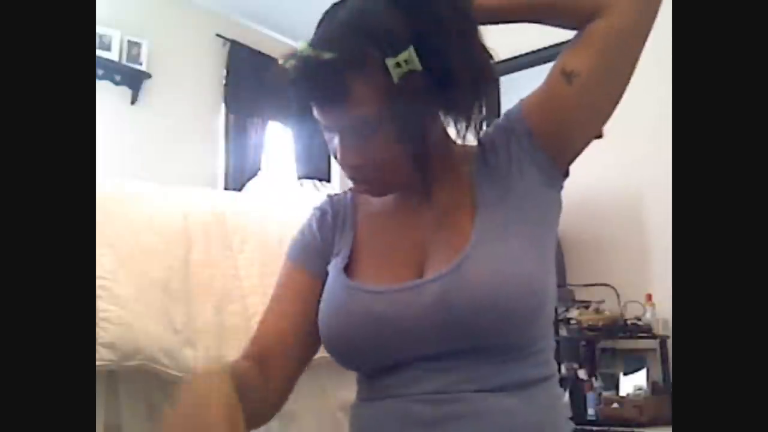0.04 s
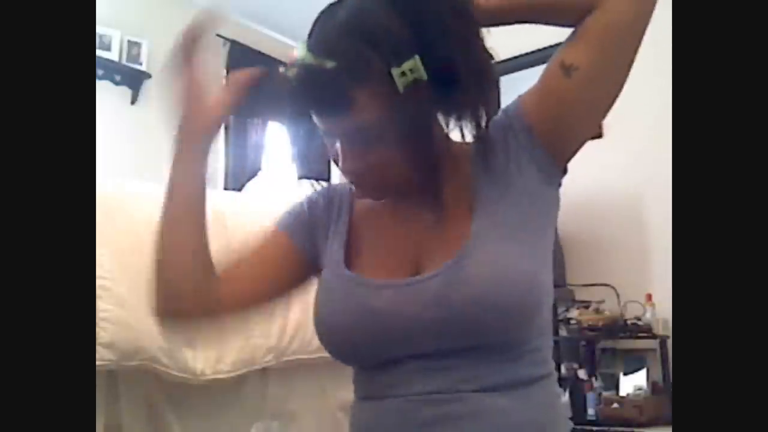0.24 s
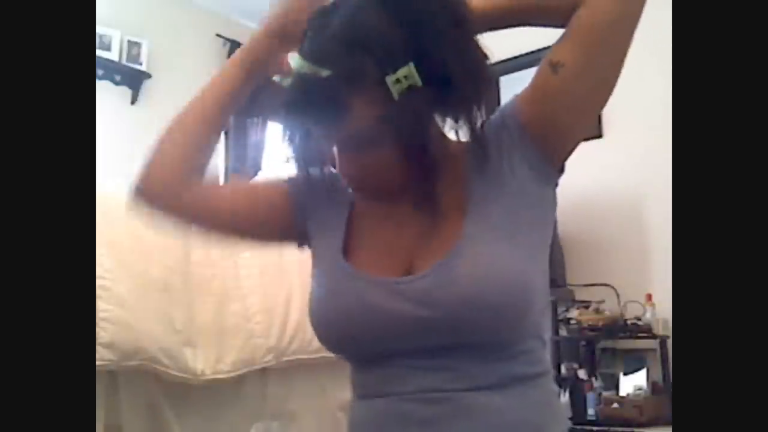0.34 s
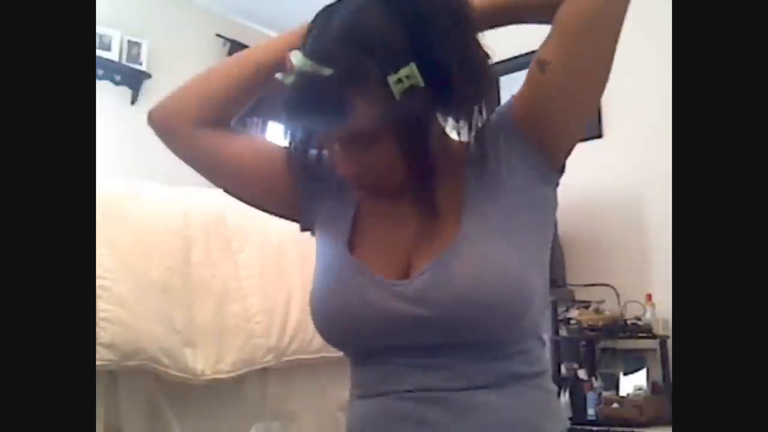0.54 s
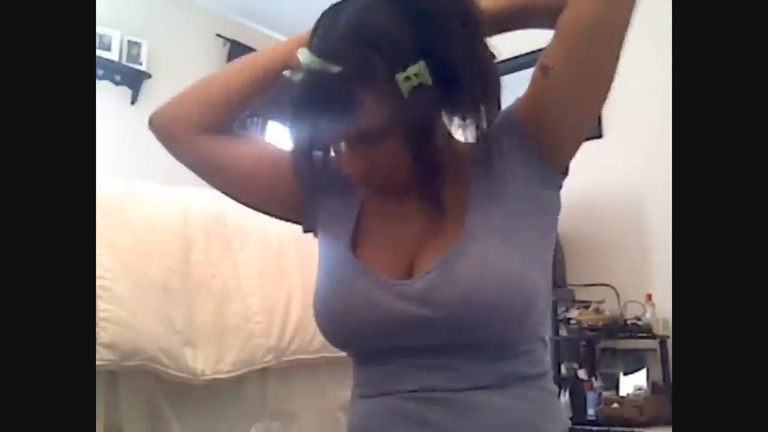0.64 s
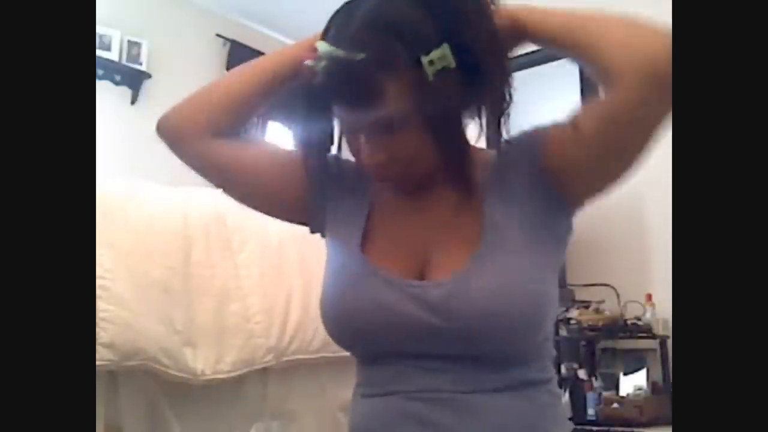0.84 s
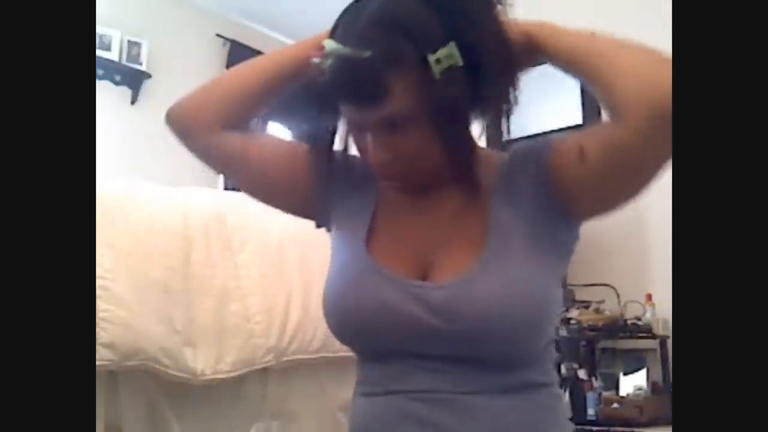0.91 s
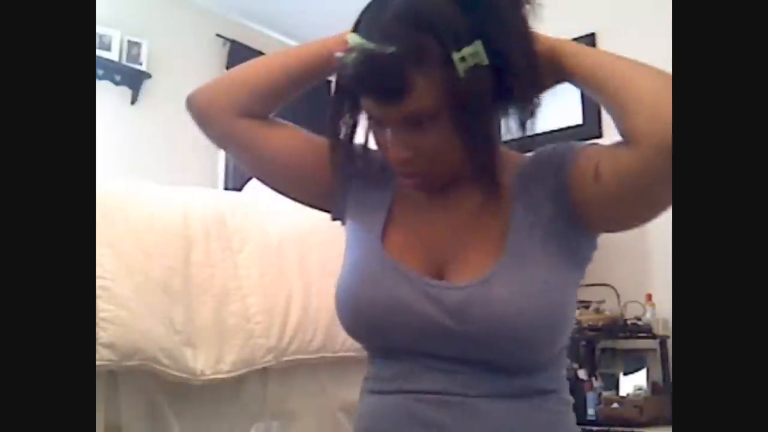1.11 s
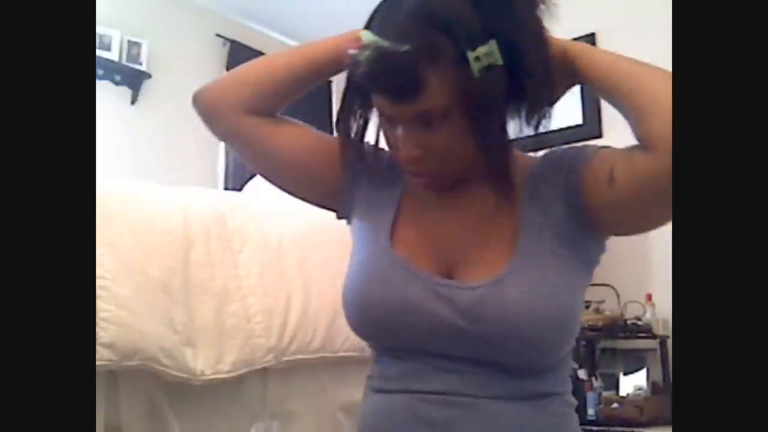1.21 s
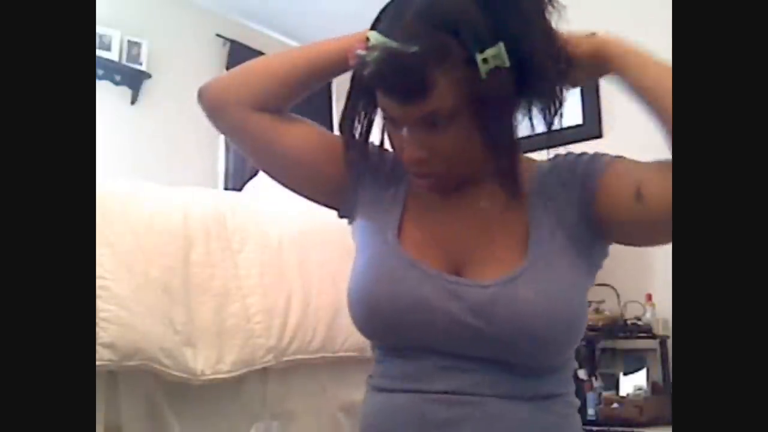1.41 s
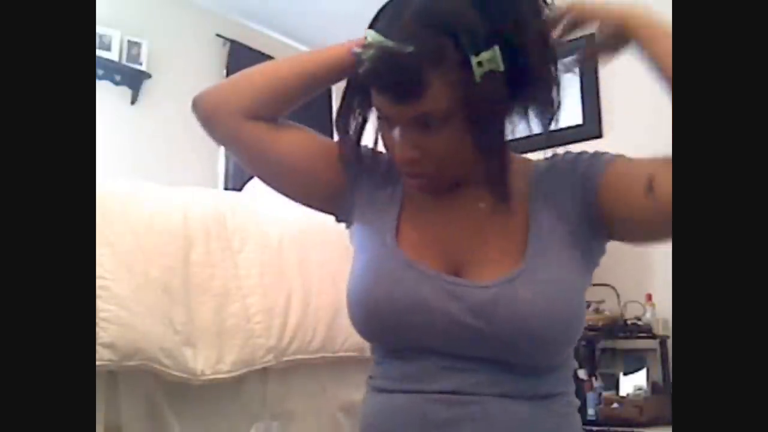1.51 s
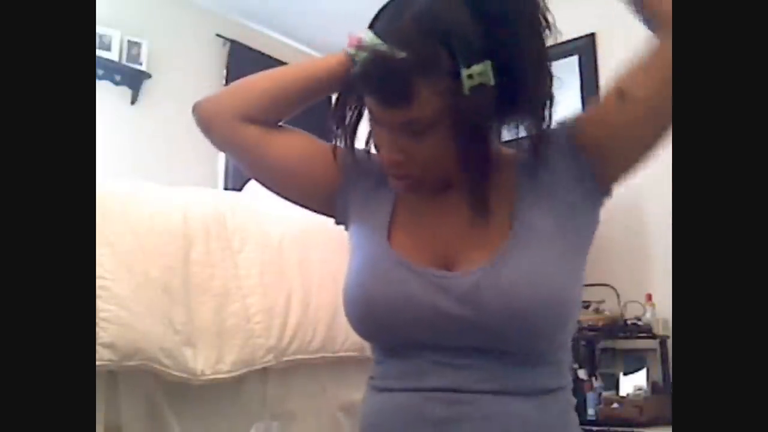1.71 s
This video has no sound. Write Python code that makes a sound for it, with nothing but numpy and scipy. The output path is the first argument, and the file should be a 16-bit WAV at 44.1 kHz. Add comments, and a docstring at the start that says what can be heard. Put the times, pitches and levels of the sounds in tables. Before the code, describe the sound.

One short low knock on a desk, then faint clicks and soft rustling in a bedroom.

```python
"""A quiet bedroom, where a small item is set down on a desk right by the microphone.
Its edge scuffs the surface, then it lands with a low knock that rings the desk and the room.
Two faint plastic clicks follow from further off. Someone shifts on a seat with soft bumps and
brushes of hair and sleeves, over room rumble, a fan's hum and microphone hiss."""
import sys
import numpy as np
from scipy import signal
from scipy.fft import rfft, irfft
from scipy.io import wavfile

SR = 44100
rng = np.random.default_rng(int(sys.argv[2]) if len(sys.argv) > 2 else 0)


def to_wav(sig):
    """Store sig (one row per channel, or 1-D mono) as 16-bit WAV at the path in sys.argv[1].

    Samples outside -1..1 are clipped; the rate is SR.
    """
    pcm = np.clip(np.atleast_2d(sig), -1, 1) * 32767
    pcm = np.round(pcm).astype(np.int16)
    wavfile.write(sys.argv[1], SR, pcm.T)  # frames by channels


N = 77175


def undb(db):
    """Decibels to gain."""
    return 10 ** (np.asarray(db) / 20)


def unit(x):
    """Scale to rms 1."""
    return x / np.sqrt(np.mean(x ** 2))


def since(start):
    """Seconds from a moment, for every sample."""
    return np.arange(N) / SR - start


def fade(start, t60):
    """Envelope with a hard attack and an exponential decay, 60 dB down after t60 seconds."""
    t = since(start)
    return (t >= 0) * np.exp(-np.log(1000) * np.maximum(t, 0) / t60)


def through(x, response):
    """Pass a sound through an impulse response."""
    return signal.fftconvolve(x, response)[:N]


def lowpass(x, hz):
    """Gentle two-pole low-pass."""
    return signal.sosfilt(signal.butter(2, hz, fs=SR, output="sos"), x)


def resonate(x, hz, width_hz):
    """Two identical resonators in series, gain 1 at their centre."""
    b, a = signal.iirpeak(hz, hz / width_hz, fs=SR)
    return signal.lfilter(b, a, signal.lfilter(b, a, x))


def along(hz, points, column=1):
    """Read a column of a table on a log-frequency scale."""
    points = np.array(points, float)
    return np.interp(np.log(hz + 1), np.log(points[:, 0]), points[:, column])


def noise(colour):
    """Noise of rms 1, shaped by an EQ curve."""
    gain = undb(along(np.fft.rfftfreq(N, 1 / SR), colour))
    return unit(irfft(rfft(rng.standard_normal(N)) * gain, N))


def modes(start, table, build_cycles):
    """A struck object: sines that build up over build_cycles periods and ring out."""
    t = np.maximum(since(start), 0)
    ring = 0
    for hz, db, t60 in table:
        attack = 1 - np.exp(-hz * t / build_cycles)
        ring += undb(db) * np.sin(2 * np.pi * hz * t) * attack * fade(start, t60)
    return ring


def room_tone():
    """A steady bed of room rumble and microphone hiss."""
    # EQ curve of the bed (frequency [Hz], relative level [dB])
    colour = [(15, -29), (25, -9), (48, -1.5), (92, -1), (124, -5), (145, -8), (281, -10), (336, -11),
              (444, -7.5), (480, -9), (518, -10.5), (954, -13.5), (1670, -15), (3240, -24.5),
              (11000, -29.5), (14300, -111), (22000, -120)]
    return undb(-54) * noise(colour)


def fan():
    """A fan's faint drone and whine: narrow bands of noise that waver."""
    # the fan's bands (centre [Hz], width [Hz], rms level [dB])
    bands = [(48.4, 12, -63), (120, 8, -66), (360, 30, -65), (942, 25, -72), (8000, 8, -87)]
    bins = np.fft.rfftfreq(N, 1 / SR)
    hum = 0
    for hz, width, db in bands:
        bell = np.exp(-(2 * (bins - hz) / width) ** 2)
        hum += undb(db) * unit(irfft(rfft(rng.standard_normal(N)) * bell, N))
    return hum


def bedroom():
    """Impulse response of the furnished room: each half-octave dies at its own rate."""
    # the room's reverb (frequency [Hz], relative level [dB], t60 [s])
    reverb = [(40, -5, 0.34), (121, 12, 0.2), (205, -2, 0.31), (366, 8, 0.24), (650, -8.5, 0.36),
              (990, -3, 0.33), (2280, 1, 0.25), (5000, -4.5, 0.33), (11000, 13, 0.26)]
    predelay_s = 0.0065
    bins = np.fft.rfftfreq(N, 1 / SR)
    white = rfft(rng.standard_normal(N))
    tail = 0
    for centre in 32 * 2 ** np.arange(0, 9, .5):
        share = np.maximum(1 - 2 * abs(np.log2((bins + 1) / centre)), 0)
        band = irfft(white * share, N) * undb(along(centre, reverb))
        t60 = along(centre, reverb, column=2)
        trim = np.sqrt(2 * np.log(1000) / (t60 * SR))  # same energy however long the decay
        tail += band * fade(predelay_s, t60) * trim
    return tail


def swell(peak, db, half_width):
    """Bell-shaped envelope for a soft movement."""
    return undb(db) * np.exp(-(since(peak) / half_width) ** 2)


def seat_bumps():
    """A body shifts on its seat: dull swells of bass-heavy noise."""
    # the bumps (peak time [s], level [dB], half-width [s])
    bumps = [(0.303, -47.5, 0.057), (0.409, -53, 0.027), (0.503, -49, 0.013), (0.636, -62, 0.033),
             (0.748, -48.5, 0.022), (1.099, -44, 0.0098), (1.233, -41.5, 0.018), (1.318, -44.5, 0.041),
             (1.637, -46.5, 0.031)]
    # their EQ curve (frequency [Hz], relative level [dB])
    colour = [(28, -23), (50, 7.5), (115, -4.5), (170, -9.5), (270, -16), (370, -7), (520, -37),
              (1000, -55), (4000, -51)]
    return noise(colour) * sum(swell(*bump) for bump in bumps)


def rustle():
    """Hair and sleeves brush lightly, each stroke a swelling band of noise."""
    # the strokes (peak time [s], level [dB], half-width [s], centre [Hz])
    strokes = [(0.687, -58.5, 0.035, 860), (0.859, -62.5, 0.016, 2400), (0.977, -56, 0.023, 1240),
               (1.035, -58, 0.028, 684), (1.162, -68, .05, 3150), (1.331, -64, 0.031, 2440),
               (1.455, -62, 0.077, 1670), (1.58, -65, 0.072, 1040), (1.653, -61.5, 0.025, 1760)]
    brushes = 0
    for peak, db, half_width, hz in strokes:
        friction = resonate(rng.standard_normal(N), hz, width_hz=430)
        brushes += swell(peak, db, half_width) * unit(friction)
    return brushes


def plastic_clicks(room):
    """Two light taps ring plastic further off in the room; the second is duller."""
    # the taps (time [s], level [dB], low-pass cutoff [Hz])
    taps = [(0.3836, -36.5, 9800), (0.4405, -34, 2770)]
    # the plastic's modes (frequency [Hz], relative level [dB], t60 [s])
    plastic = [(900, -7, .028), (2270, -10, .045), (2520, -1, .028), (2680, -7, .02), (3020, -5, .018),
               (3930, -17, .02), (4820, 1, .018), (5020, 0, .016)]
    direct = 0
    for start, db, cutoff in taps:
        ring = modes(start, plastic, build_cycles=2.7)
        direct += undb(db) * lowpass(lowpass(ring, cutoff), cutoff)
    short_room = room * fade(0, t60=0.68)
    return direct + undb(0.5) * through(direct, short_room)


def edge_scuffs(room):
    """The item's edge grazes the desk before it lands: bursts of tiny contacts excite resonances."""
    # the grazes (time [s], level [dB], t60 [s])
    grazes = [(0.2135, -29, 0.031), (.2173, -26.5, 0.024), (0.2306, -33.5, 0.035)]
    # the resonances they excite (centre [Hz], width [Hz], relative level [dB])
    body = [(298, 230, -3.5), (976, 410, 8), (1463, 270, -4.5), (2400, 320, -10.5), (3220, 260, -8.5),
            (4140, 240, -9), (5300, 1160, -21.5)]

    def ring(x):
        return sum(undb(db) * resonate(x, hz, width) for hz, width, db in body)

    direct = 0
    for start, db, t60 in grazes:
        grit = rng.standard_normal(N)
        direct += undb(db) * ring(grit * fade(start, t60)) / np.std(ring(grit))
    return direct + undb(1) * through(direct, room)


def landing_knock(room):
    """The item lands: a pulse and a dry crack echo off near surfaces while the desk rings."""
    # the landing (time [s], level [dB], contact time [ms])
    landings = [(0.2373, -4, 0.3)]
    # EQ curve of the contact's crack (frequency [Hz], relative level [dB])
    crack_colour = [(500, 4), (1400, -12), (2000, 0.5), (3300, -0.5), (5200, -22), (7000, -5.5),
                    (7900, -30), (11000, -42)]
    # the desk's modes (frequency [Hz], relative level [dB], t60 [s])
    desk = [(46, -39, .4), (84, -33, .14), (186, -40, .16), (286, -29, .15), (362, -25, .13),
            (428, -25, .11), (505, -37, .1), (640, -37, .14), (792, -24, .03), (941, -34, .2),
            (1054, -35, .06), (1445, -37, .08), (1560, -42, .07)]
    # reflections off near surfaces (delay [s], gain [dB], low-pass cutoff [Hz])
    reflections = [(.00255, -6.5, 3500), (.0113, -12, 480), (.0137, -19, 520), (.016, -29, 1200)]
    impact, ring, echoes = 0, 0, 0
    for start, db, contact_ms in landings:
        u = since(start) * 1000 / contact_ms
        pulse = -u * np.exp((1 - u ** 2) / 2)  # a smooth push radiates as its rate of change
        crack = undb(-26) * noise(crack_colour) * fade(start, t60=0.014)
        impact += undb(db) * (pulse + crack)
        ring -= undb(db + 3) * modes(start, desk, build_cycles=0.2)
    for delay, db, cutoff in reflections:
        echoes += undb(db) * np.interp(since(delay), since(0), lowpass(impact, cutoff))
    return impact + lowpass(ring, hz=3020) + echoes + undb(-11.5) * through(impact, room)


def scene():
    """Mono mix: knock, scuffs and clicks share the room's reverb, over movement and background."""
    room = bedroom()
    contacts = landing_knock(room) + edge_scuffs(room) + plastic_clicks(room)
    movement = seat_bumps() + rustle()
    background = room_tone() + fan()
    return (contacts + movement + background)[None]


def record(dry):
    """The small recorder thins the deepest bass and cuts the top steeply."""
    low_cut_hz, high_cut_hz = 20, 11180
    thinned = signal.sosfilt(signal.butter(1, low_cut_hz, "high", fs=SR, output="sos"), dry)
    return signal.sosfilt(signal.ellip(10, .2, 60, high_cut_hz, fs=SR, output="sos"), thinned)


dry = scene()
out = record(dry)
to_wav(out)
```